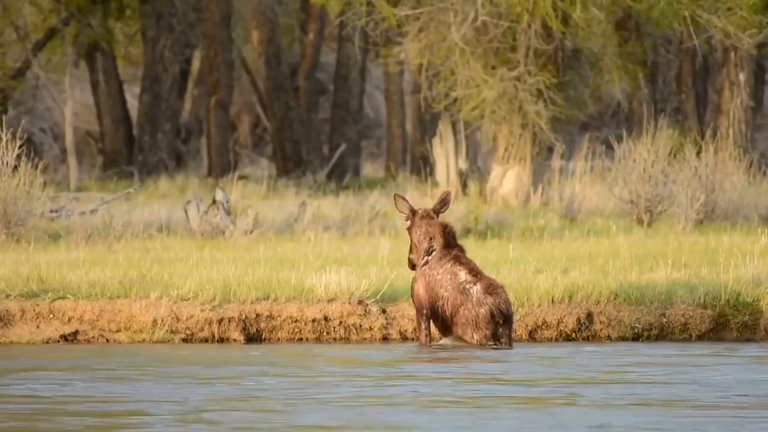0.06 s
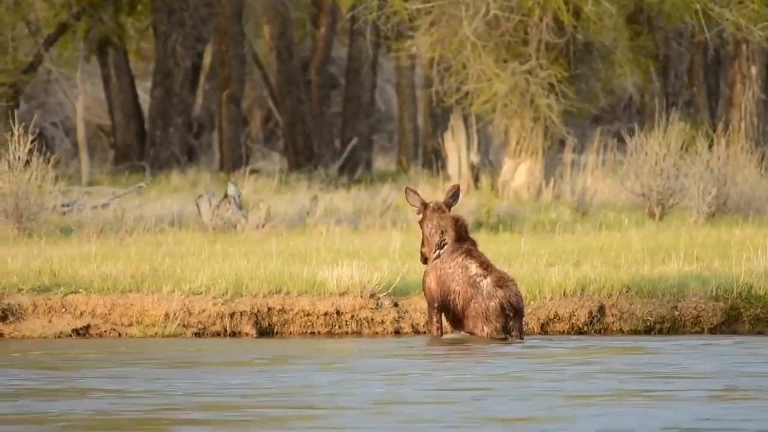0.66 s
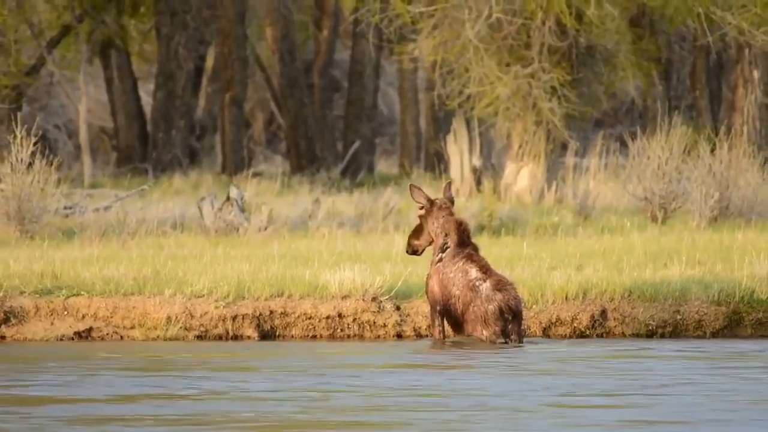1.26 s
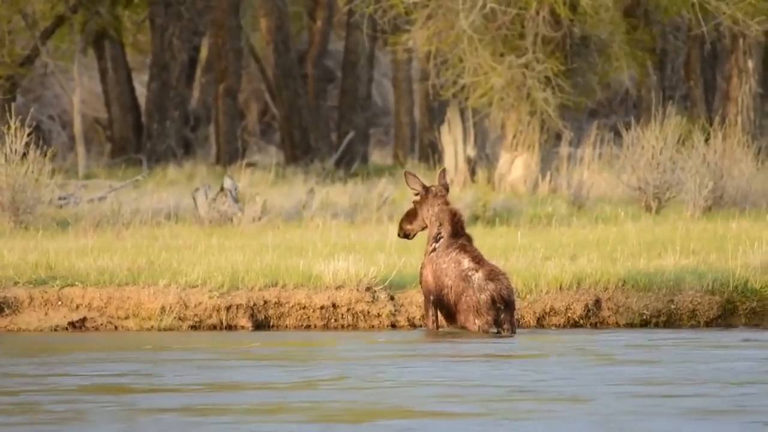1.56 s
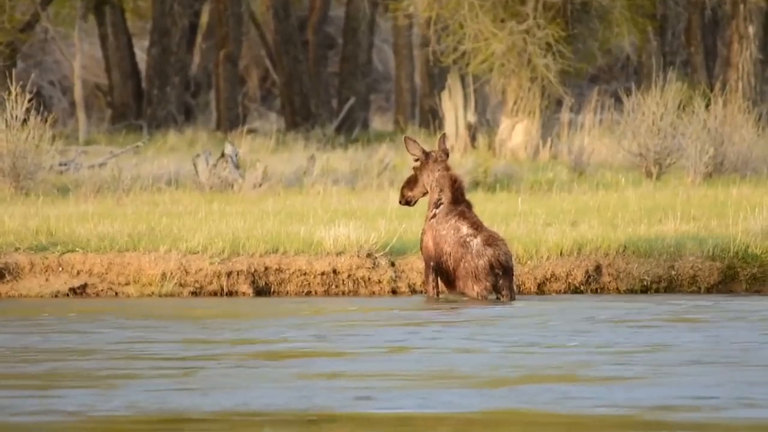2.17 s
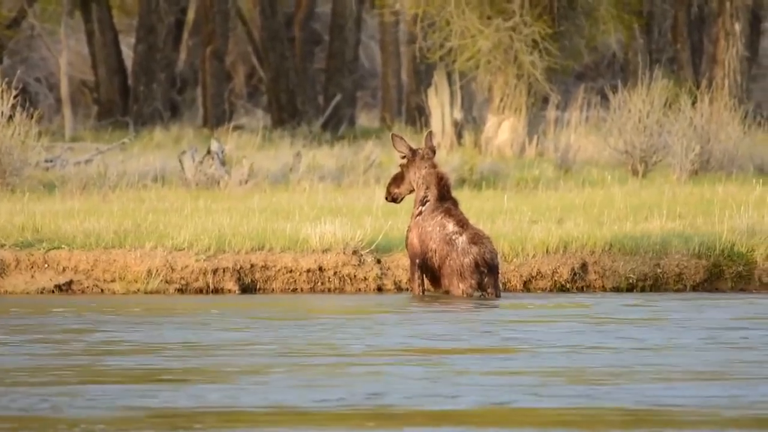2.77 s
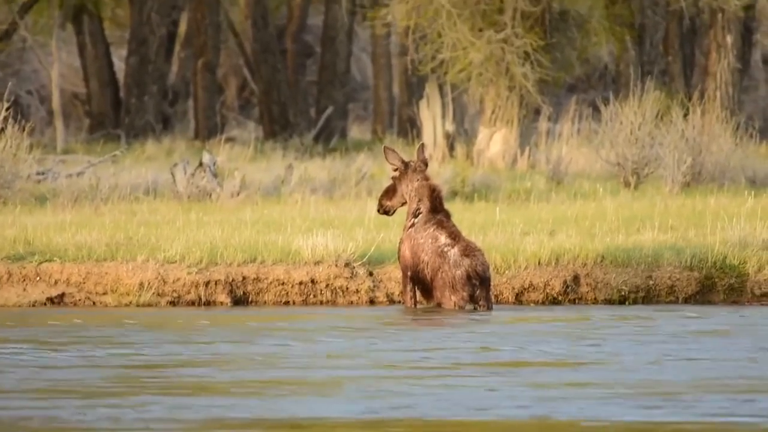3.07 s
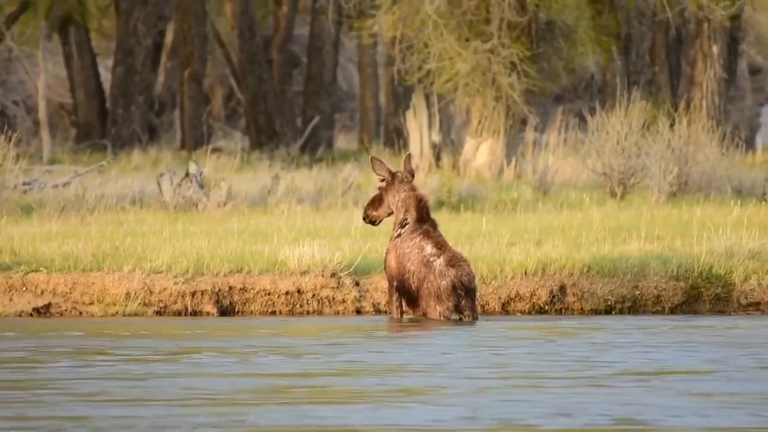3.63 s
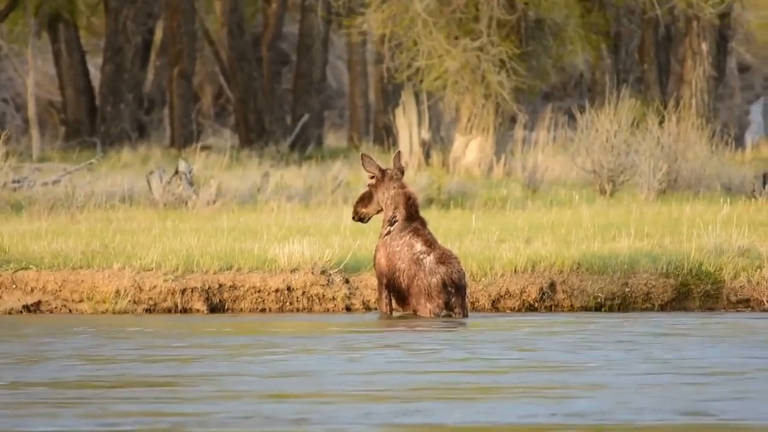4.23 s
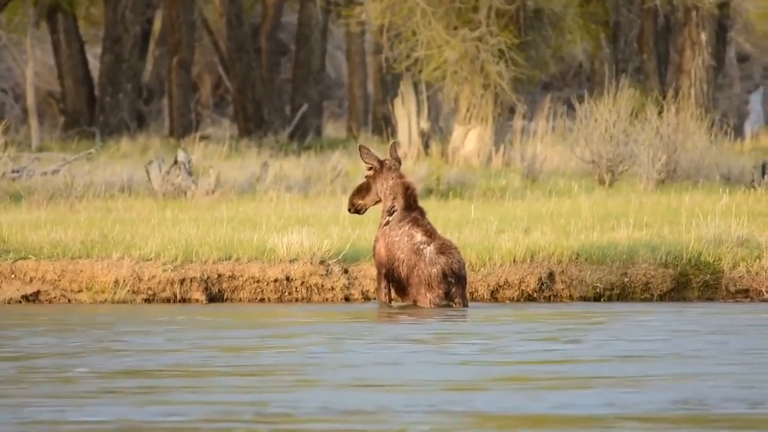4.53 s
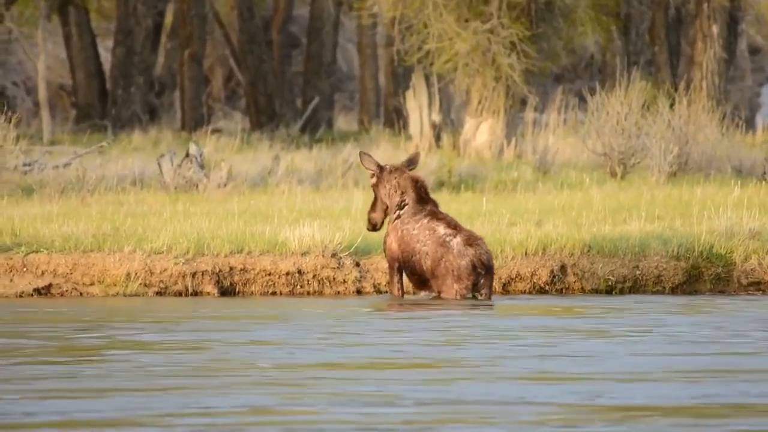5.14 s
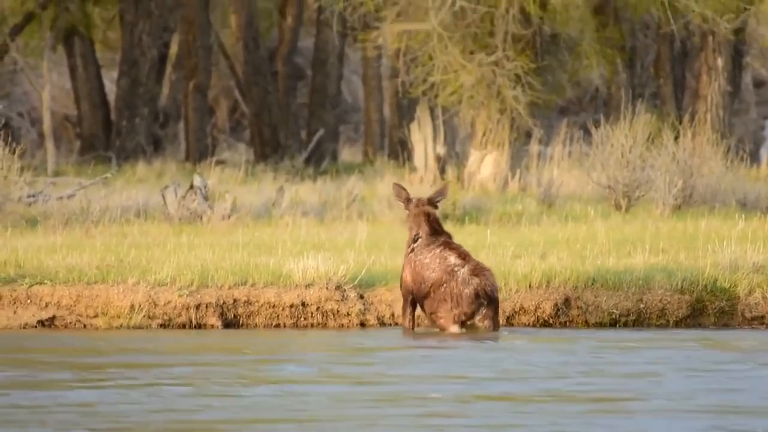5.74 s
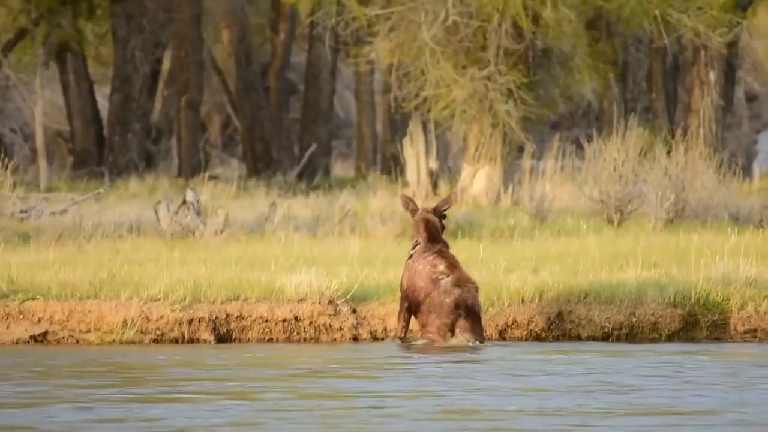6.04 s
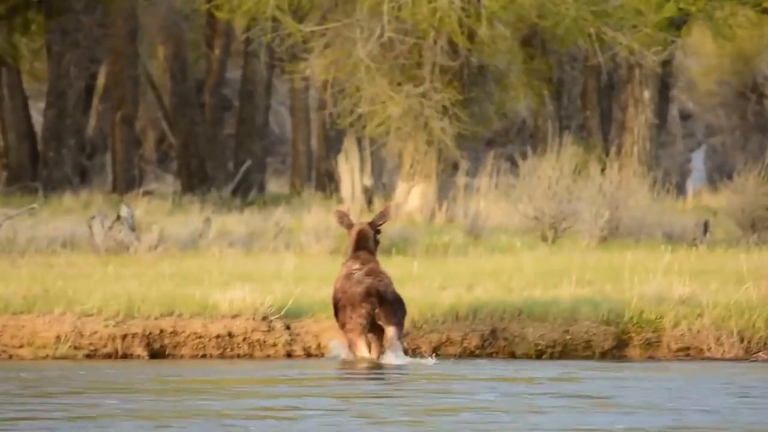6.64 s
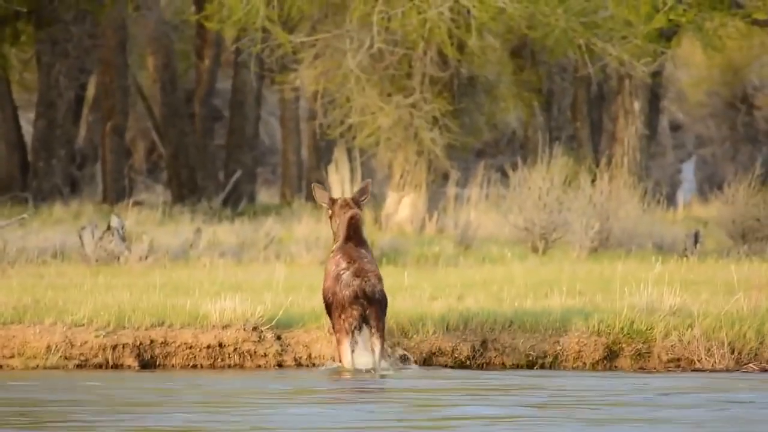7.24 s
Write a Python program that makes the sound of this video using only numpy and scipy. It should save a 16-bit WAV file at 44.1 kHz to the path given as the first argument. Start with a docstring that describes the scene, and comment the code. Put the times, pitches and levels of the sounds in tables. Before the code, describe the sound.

Repeated high frog trills ring above river wash and brief wind rumble, until a moose wades quietly through the shallows.

```python
"""By a river, chorus frogs trill: each trill is a run of short ringing pulses that mostly slows and rises.
More frogs answer from further off, one clicks in a hollow voice, and small birds whistle faintly.
The river washes steadily with countless tiny splashes, and gusts of wind buffet the microphone.
Near the end a moose wades out through the shallows of the far bank, sloshing and stirring up bubbles."""
import sys
import numpy as np
from scipy import signal
from scipy.fft import rfft, irfft
from scipy.io import wavfile
from scipy.ndimage import uniform_filter1d

SR = 44100
rng = np.random.default_rng(int(sys.argv[2]) if len(sys.argv) > 2 else 0)


def transcribe(signal):
    """Save signal, clipped to [-1, 1], as a 16-bit WAV file at the path in sys.argv[1]."""
    frames = np.atleast_2d(signal).T
    limited = np.clip(frames, -1, 1)
    pcm = np.round(limited * 32767).astype(np.int16)
    wavfile.write(sys.argv[1], SR, pcm)


N = 330750
TIME = np.arange(N) / SR
SIDE = np.array([[1], [-1]])  # adds a sound on the left and subtracts it on the right

# the near frogs' trills, which their neighbours join: start/s, end/s, pulses, gap growth per pulse,
# peak level/dB, place of the peak (0-1), first f/Hz, last f/Hz
TRILLS = [(0.004, 0.262, 6, 0.023, -39.5, 0.4, 2836, 3080),
          (0.282, 0.915, 14, 0.044, -32, 0.66, 2622, 3016),
          (0.564, 1.057, 10, 0.065, -35.5, 0.5, 2636, 3095),
          (1.124, 1.338, 6, 0.03, -47.5, 0.56, 2590, 2620),
          (1.394, 1.766, 7, 0.076, -38.0, 0.62, 2600, 2600),
          (1.676, 2.468, 17, 0.035, -31.5, 0.68, 2667, 2805),
          (2.46, 2.699, 6, 0.0022, -41, 0.59, 2876, 2900), (2.58, 2.7, 4, 0.03, -44, 1, 2644, 2600),
          (2.737, 3.421, 15, 0.052, -31, 0.74, 2640, 3004), (2.747, 3.045, 8, 0.032, -39, 0.45, 2730, 2970),
          (3.458, 3.76, 8, 0.028, -40.5, 0.53, 2550, 2630), (3.785, 4.325, 11, 0.011, -43.5, 0, 2600, 3000),
          (4.073, 4.263, 6, 0.036, -41.5, 0.5, 2620, 2600),
          (4.228, 4.896, 14, 0.039, -35, 0.46, 2657, 2850),
          (4.456, 4.784, 7, 0.019, -36.5, 0.84, 2780, 2790.0),
          (4.885, 5.093, 5, 0.0, -37, 0.15, 2936, 3080), (5.068, 5.703, 14, 0.048, -33.5, 0.62, 2687, 3044),
          (5.352, 5.852, 10, 0.051, -38, 0.6, 2790, 3060), (5.828, 6.274, 11, 0.044, -44, 0.52, 2505, 2660),
          (5.959, 6.378, 9, 0.02, -41, 0.51, 2720.0, 2810), (6.541, 6.701, 5, 0.025, -43, 0.74, 2620, 2640),
          (6.721, 6.937, 5, 0.0085, -43.5, 0.6, 2810.0, 2760.0),
          (7.24, 7.358, 3, 0.035, -46, 0.47, 2930.0, 2970.0)]


def undb(db):
    """Turn decibels into a gain."""
    return 10 ** (np.asarray(db) / 20)


def unit(x):
    """Scale a signal to an average strength (rms) of 1."""
    return x / np.sqrt(np.mean(x ** 2))


def curve(rows):
    """Gain over time from rows of t/s, level/dB; silent outside them."""
    s, db = np.transpose(rows)
    return undb(np.interp(TIME, s, db)) * (TIME >= s[0]) * (TIME <= s[-1])


def colour(x, points):
    """Shape the tone with rows of f/Hz, gain/dB."""
    hz, db = np.transpose(points)
    bins = np.maximum(np.arange(N // 2 + 1) * SR / N, 1)
    return irfft(rfft(x) * undb(np.interp(np.log(bins), np.log(hz), db)), N)


def lowpass(x, hz, order=2):
    """Keep what lies below hz."""
    return signal.sosfilt(signal.butter(order, min(hz, SR / 2 - 1), fs=SR, output="sos"), x)


def walk(rate):
    """Wander smoothly at random, about rate turns a second, with spread 1."""
    step = max(int(SR / rate), 1)
    stairs = np.repeat(rng.standard_normal(N // step + 1), step)
    return unit(uniform_filter1d(stairs, step)[:N])


def add(out, s, sound):
    """Mix a sound in at s seconds."""
    i = int(s * SR)
    a, b = max(i, 0), min(i + len(sound), N)
    if b > a:
        out[a:b] += sound[a - i:b - i]


def ring(hz, rise_ms, sharp, phase):
    """One ringing pulse: it swells to 1 in rise_ms and dies away; more sharp makes it shorter."""
    t = TIME[:SR // 40]
    age = t * 1000 / rise_ms
    return (age * np.exp(1 - age)) ** sharp * np.sin(2 * np.pi * (hz * t + phase))


def trill(start, end, pulses, slowing, peak_db, crest, swell_db):
    """One call whose gaps grow and whose level arches. Gives rows of t/s, level/dB, progress (0-1)."""
    count = int(round(pulses))
    beats = np.append(0, np.cumsum((1 + slowing) ** np.arange(count - 1)))
    times = start + (end - start) * beats / beats[-1]
    progress = np.linspace(0, 1, count)
    return np.transpose([times, peak_db - swell_db * (progress - crest) ** 2, progress])


def meadow(x, echo_s, echo_db):
    """Add echoes from grass, bank and trees, different in each ear; they fade 60 dB in echo_s."""
    t = TIME[:SR // 2]
    tails = rng.standard_normal((2, len(t))) * np.exp(-np.log(1000) * t / echo_s) * (t > .003)
    mid, side = (signal.fftconvolve(x, tail / np.linalg.norm(tail))[:N] for tail in tails)
    return x + undb(echo_db) * (mid + .5 * side * SIDE)


def water(spectrum, flicker_db, flicker_rate):
    """A wash of countless small splashes: the low gurgle flickers, the hiss stays smooth."""
    # how wide the water sounds: f/Hz, side level against the middle/dB
    width = [(60, -42), (250, -56), (700, -18), (1400, -7), (3000, -2), (5500, 0.5), (8000, -2.5),
             (9500, -12), (13000, 1)]

    def wash():
        noise = rng.standard_normal(N)
        flicker = undb(flicker_db * walk(flicker_rate)) - 1
        return colour(noise + flicker * lowpass(noise, 2360), spectrum)
    return unit(wash()) + colour(unit(wash()), width) * SIDE


def river(level_db=-52):
    """Flowing water makes a steady wash."""
    # the river's tone: f/Hz, relative level/dB
    spectrum = [(25, 5.5), (70, 2), (200, 0.5), (330, -4), (520, -2), (1000, -7), (1450, -6), (2000, -11.5),
                (3500, -13.5), (5000, -16.5), (7500, -19), (10000, -21.5), (15000, -28.5)]
    return undb(level_db) * water(spectrum, flicker_db=1.0, flicker_rate=30)


def chorus(count=600, centre_hz=2800, spread_hz=520, gain_db=-6.0):
    """The most distant frogs merge into one rattle that swells and ebbs."""
    # the rattle's swells: t/s, level before gain_db/dB
    swells = [(0.0, -53), (0.67, -48.5), (1.04, -52.5), (1.79, -53), (2.61, -48), (2.96, -44), (3.2, -54.5),
              (4.63, -46), (4.78, -57), (7.5, -50)]
    out = np.zeros(N)
    for when, pitch, size, phase in rng.random((count, 4)):
        pulse = ring(centre_hz + spread_hz * (pitch - .5), rise_ms=3.0, sharp=3.4, phase=phase)
        add(out, when * TIME[-1], undb(10 * size) * pulse)
    return undb(gain_db) * curve(swells) * unit(meadow(out, echo_s=1.0, echo_db=-4.0))


def far_frogs(lead_s=.12, trail_s=.08, gap_s=0.051, slowing=.035, below_hz=90, above_hz=50, gain_db=-11):
    """Neighbours further off join every trill, a little out of step and tune, blurred by the meadow."""
    out = np.zeros(N)
    for call, (early, late, tune) in zip(TRILLS, rng.random((len(TRILLS), 3))):
        start, end, _, _, peak_db, crest, first_hz, last_hz = call
        start, end = start - 2 * lead_s * early, end + 2 * trail_s * late
        low_hz, high_hz = first_hz - 2 * below_hz * tune, last_hz + above_hz
        pulses = 2 + (end - start) / gap_s
        for s, db, progress in trill(start, end, pulses, slowing, peak_db + gain_db, crest, swell_db=14):
            hz = low_hz + (high_hz - low_hz) * progress ** 1.33
            add(out, s, undb(db) * ring(hz, rise_ms=1.45, sharp=1.86, phase=rng.random()))
    return meadow(out, echo_s=0.19, echo_db=-6.5)


def near_frogs(rise_ms=2.3, sharp=1.25, scatter_db=.5, pitch_scatter=0.0049, rise_scatter=.08):
    """Each pulse rings the frog's throat sac, whose pitch climbs ever faster through most trills."""
    # steady tones that ring faintly with every pulse: f/Hz, level against the main tone/dB
    faint_tones = [(1450, -24), (3110, -27), (5180, -33), (10340, -27), (10700, -30.5)]
    out = np.zeros(N)
    for *call, first_hz, last_hz in TRILLS:
        for s, db, progress in trill(*call, swell_db=24):
            phase, size, tune, stretch = rng.standard_normal(4)
            hz = first_hz + (last_hz - first_hz) * progress ** 1.81
            rise = rise_ms * np.exp(rise_scatter * stretch)
            sac = ring(hz * (1 + pitch_scatter * tune), rise, sharp, phase)
            faint = sum(undb(level) * ring(f, rise, sharp, -phase) for f, level in faint_tones)
            add(out, s - rise / 1000, undb(db + scatter_db * size) * (sac + faint))
    return meadow(out, echo_s=0.05, echo_db=-12.5)


def birds():
    """Small birds send thin, wavering whistles from the trees."""
    # whistles: t/s, length/s, start f/Hz, end f/Hz, level/dB, wobble as a share of the pitch
    notes = [(0.006, 0.11, 4420, 4480, -52.5, 0.056), (0.051, 0.93, 5130, 5190, -62, 0.051),
             (0.427, 0.035, 3950, 3960, -58, .005), (0.817, 0.036, 3890, 4020, -57, .005),
             (0.907, 0.036, 3930, 3910, -61, 0.004), (0.938, 0.05, 7100, 7350, -56, 0.01),
             (1.011, 0.052, 5100, 4970, -52, 0.004), (1.007, 0.061, 4000, 4040, -63, 0.0045),
             (1.109, .03, 4050, 3980, -60, 0.0033), (3.012, 0.041, 1390, 1400, -50, .01),
             (3.06, 0.049, 1580, 1550, -61, .015), (3.226, 0.023, 2410, 2430, -53, 0.0082),
             (3.26, .025, 4700, 4370, -53.5, 0.094), (3.247, 0.53, 3070, 3010, -55.5, 0.014),
             (3.276, 0.44, 4447, 4300, -64.5, 0.05)]
    out, waver = np.zeros(N), walk(700)
    for s, length, start_hz, end_hz, db, wobble in notes:
        n = int(length * SR)
        hz = np.linspace(start_hz, end_hz, n) * (1 + wobble * np.roll(waver, int(s * SR))[:n])
        whistle = np.sin(2 * np.pi * np.cumsum(hz) / SR)
        add(out, s, undb(db) * signal.windows.tukey(n, .6) * whistle)
    return meadow(out, echo_s=0.24, echo_db=-3.5)


def clicking_frog(gain_db=2.5):
    """Clicks ring a few tones that die fast; one, an octave below the other frogs, sounds hollow."""
    # trills: start/s, end/s, pulses, gap growth per pulse, relative peak level/dB, peak's place (0-1)
    calls = [(0.051, 0.113, 2, 0.04, -47.5, 0.52), (0.221, 0.35, 4, 0.055, -53, 0.2),
             (1.241, 1.597, 8, 0.048, -52, 0.55), (2.462, 2.697, 6, 0.0041, -53.5, 0.01),
             (3.755, 4.287, 10, 0.039, -51, 0.82), (4.368, 4.756, 9, 0.019, -53.5, 0.64)]
    # ringing tones of the hollow voice: f/Hz, relative level/dB, rise/ms
    tones = [(1344, 3, 0.95), (1498, 1, 1), (2780, 7, 0.73), (8800, -10, 0.66)]
    out = np.zeros(N)
    for call in calls:
        for s, db, _ in trill(*call, swell_db=10):
            phase, tune = rng.random(2)
            detune = 1 + 0.047 * (tune - .5)
            click = sum(undb(level) * ring(hz * detune, ms, 0.37, phase) for hz, level, ms in tones)
            add(out, s - .0008, undb(db + gain_db) * click)
    return meadow(out, echo_s=0.055, echo_db=-6)


def gusts(rise_db_per_s=620, fall_db_per_s=258):
    """Wind strength over time: each gust rises quickly, holds and falls away."""
    # gusts: t at full strength/s, hold/s, level/dB
    puffs = [(0.244, 0.072, -43.5), (0.395, 0.022, -29), (0.514, 0.28, -31.5), (0.87, 0.28, -21),
             (1.235, 0.11, -30), (1.453, 0.014, -29.8), (1.553, 0.006, -32), (1.903, 0.51, -52.5),
             (2.439, 0.18, -51), (4.615, 0.026, -39), (4.706, 0.021, -26), (4.747, 0.13, -44),
             (7.136, 0.093, -38.5), (7.395, 0.02, -38)]
    power = 0
    for s, hold, db in puffs:
        before, after = np.maximum(s - TIME, 0), np.maximum(TIME - s - hold, 0)
        power = power + undb(db - rise_db_per_s * before - fall_db_per_s * after) ** 2
    return np.sqrt(power)


def wind(soft_hz=85, hard_hz=160, low_hz=28, hard_share=0.79, gain_db=-0.56):
    """Air swirls at the microphone: stronger gusts carry smaller, faster swirls."""
    strength = gusts()
    flow = rng.standard_normal(N)
    flow = flow - lowpass(flow, low_hz, order=1)
    soft = unit(lowpass(flow, soft_hz, order=4))
    hard = unit(lowpass(rng.standard_normal(N), hard_hz, order=4))
    rumble = soft + hard_share * (strength / strength.max()) ** 0.96 * hard
    # even out the rumble so that the gusts alone set its strength
    rumble = rumble / np.sqrt(uniform_filter1d(rumble ** 2, SR // 20))
    buffeting = undb(gain_db) * strength * rumble + wind_slaps()
    # the smallest swirls hit the left side harder
    small_swirls = colour(buffeting, [(100, -46), (320, -1)])
    return buffeting + 0.14 * small_swirls * SIDE


def wind_slaps(gain_db=-2):
    """Single swirls slap the microphone: each is a dip in air pressure between two small bumps."""
    # passing swirls: t/s, peak level before gain_db/dB, width/ms
    swirls = [(0.923, -4.5, 2.16), (0.952, -14, 0.99), (.998, -8, 1.56), (1.044, -21, 0.61),
              (1.081, -11.5, 0.97), (1.089, -9.5, 0.82), (1.136, -13.5, 1.25), (1.158, -12, 1.27),
              (1.335, -20, 1.28), (2.324, -22, 3.16), (4.710, -21, 1.22)]
    out = np.zeros(N)
    t = TIME[:SR // 20] - TIME[SR // 40]
    for s, db, width_ms in swirls:
        offset = t * 1000 / width_ms
        add(out, s + t[0], undb(db + gain_db) * (offset ** 2 - 1) * np.exp(-offset ** 2 / 2))
    return out


def wading_moose(count=700, bubble_db=-12):
    """Legs churn the shallows: uneven sloshing with a crowd of short bubbles that rise in pitch."""
    # surges of the wading: t/s, level/dB
    surges = [(5.8, -65), (6.22, -58.5), (6.38, -56.5), (6.48, -52.5), (6.65, -58), (7.0, -53), (7.13, -49),
              (7.35, -55.5), (7.5, -53.5)]
    # tone of the splashing: f/Hz, relative level/dB
    spectrum = [(200, -3.5), (500, -7), (850, 3), (1200, -9.5), (1480, -0.5), (2000, -12.5), (2350, -7),
                (3500, -26), (8000, -42)]
    bubbles = np.zeros(N)
    t, start = TIME[:SR // 20], surges[0][0]
    for when, pitch, size in rng.random((count, 3)):
        cycles = 700 * 2 ** (1.5 * pitch) * t  # from 700 Hz to 1.5 octaves higher
        envelope = np.exp(-cycles / 6) * (1 - np.exp(-cycles))
        bubble = envelope * np.sin(2 * np.pi * cycles * (1 + 2 * t))
        add(bubbles, start + when * (TIME[-1] - start), undb(bubble_db + 10 * size ** 3) * bubble)
    return (water(spectrum, flicker_db=3.5, flicker_rate=25) + bubbles) * curve(surges)


def scene():
    """Mix the frogs, river, birds, moose and wind in stereo."""
    # tone of the frogs' voices, two humps with a dip between: f/Hz, gain/dB
    voice = [(2300, -2.5), (2560, -1), (2660, 0.5), (2770, 2), (2930, -5), (3030, 1.5), (3250, 0)]
    left, right = colour(near_frogs() + far_frogs() + chorus(), voice) + clicking_frog()
    # the frogs sit a little to the left, so the right side hears them one sample later
    frogs = np.array([left, np.append(0, right[:-1])])
    return frogs + river() + birds() + wading_moose() + wind()


def record(dry, top_hz=15200):
    """Cut away the highest treble."""
    return signal.sosfilt(signal.ellip(10, .2, 70, top_hz, fs=SR, output="sos"), dry)


dry = scene()
out = record(dry)
transcribe(out)
```